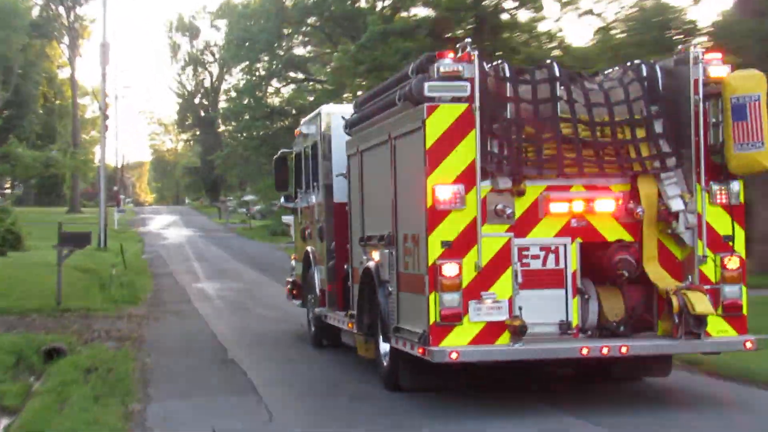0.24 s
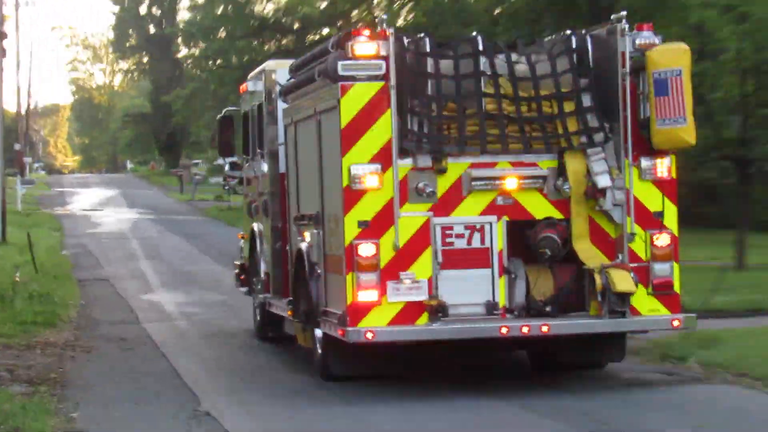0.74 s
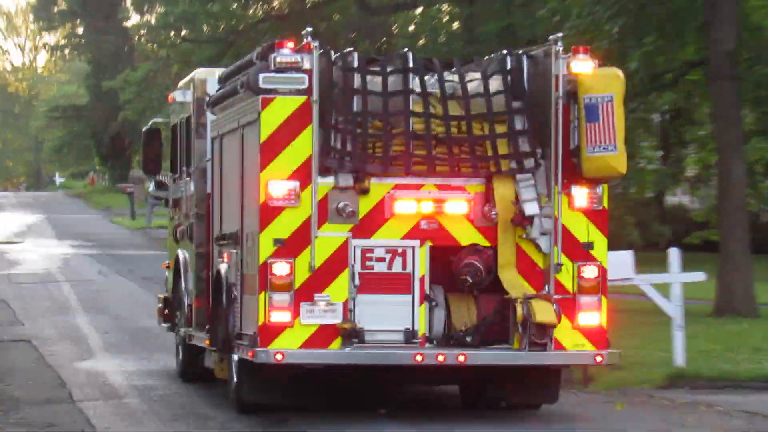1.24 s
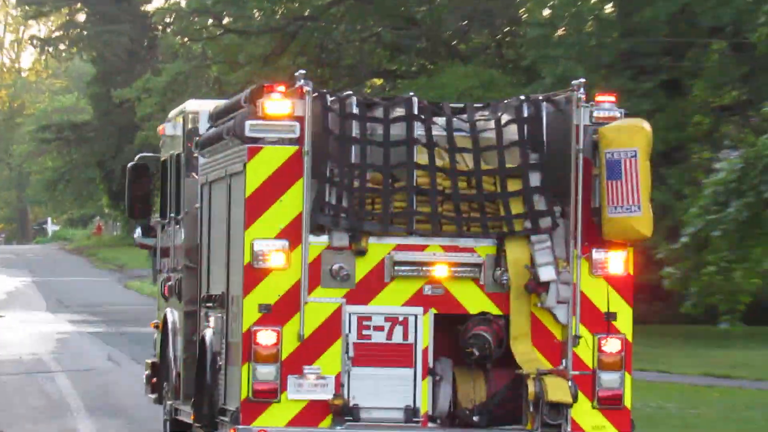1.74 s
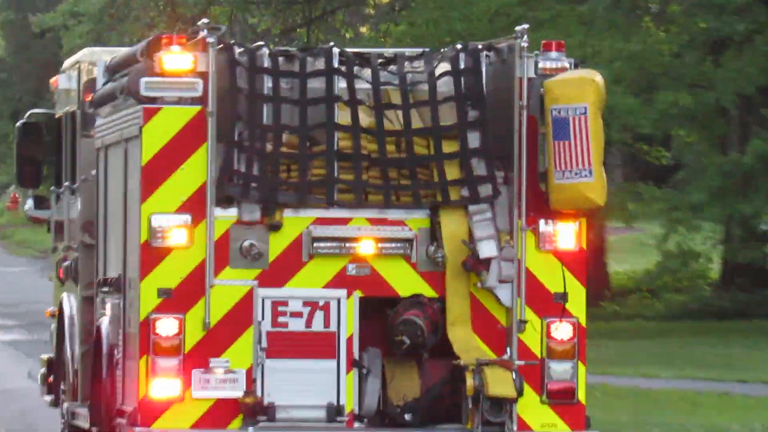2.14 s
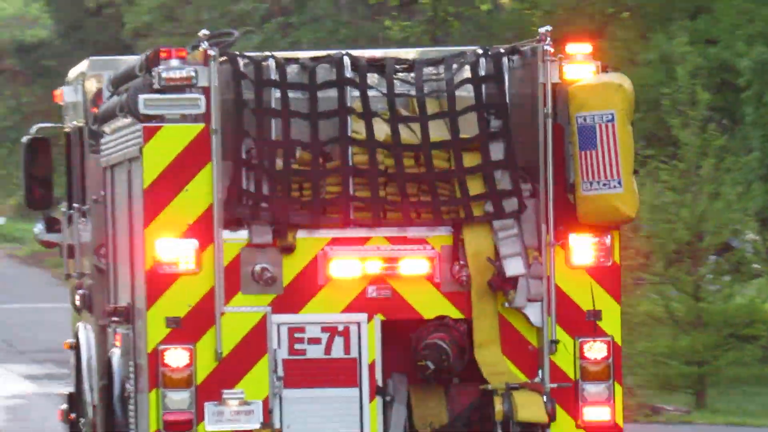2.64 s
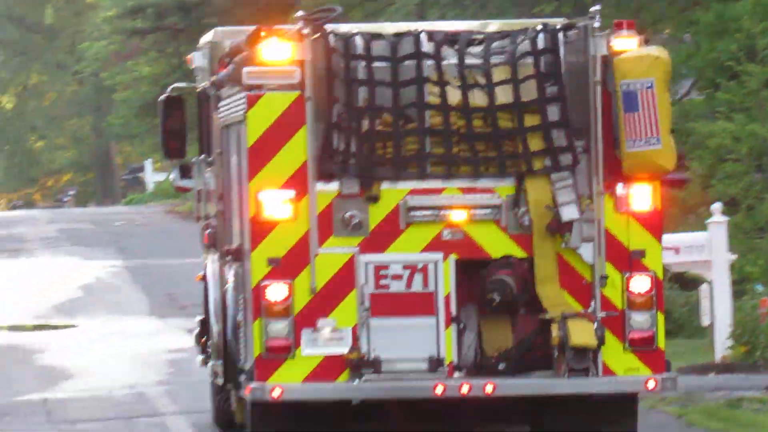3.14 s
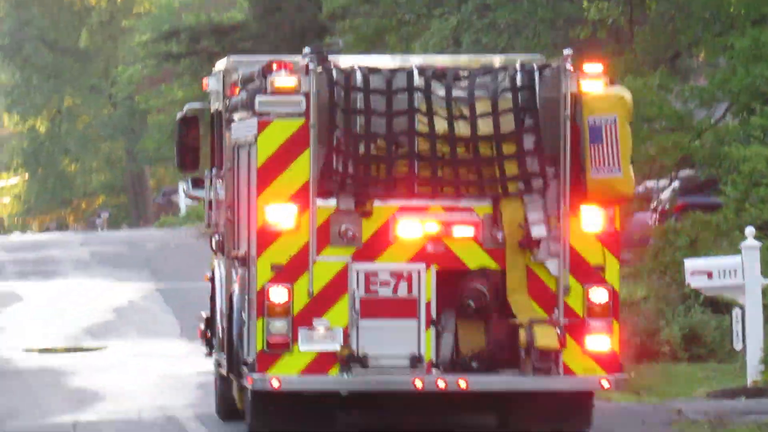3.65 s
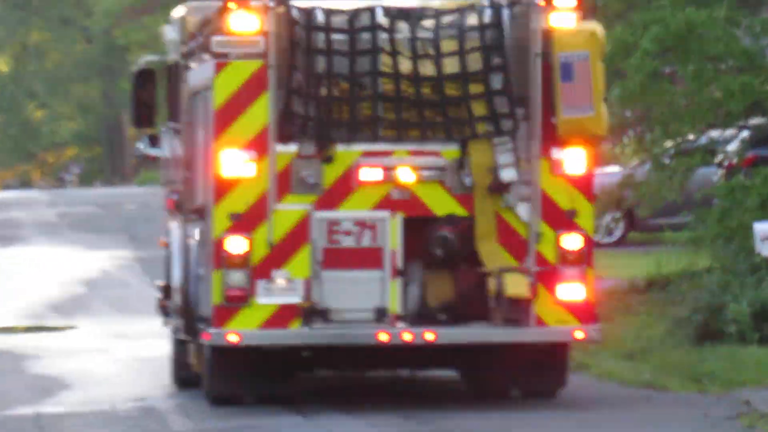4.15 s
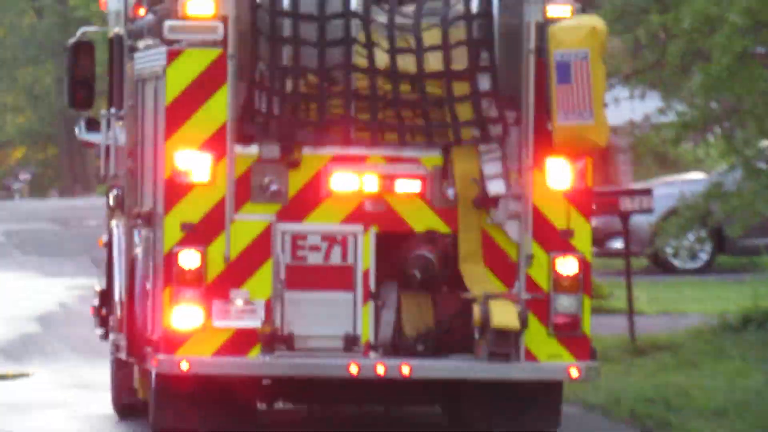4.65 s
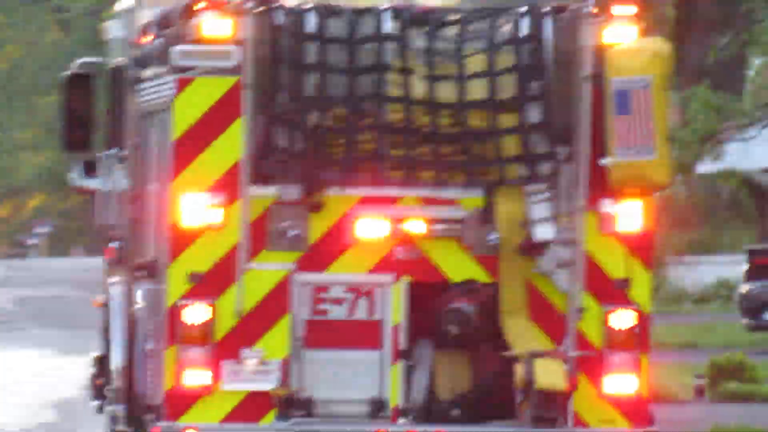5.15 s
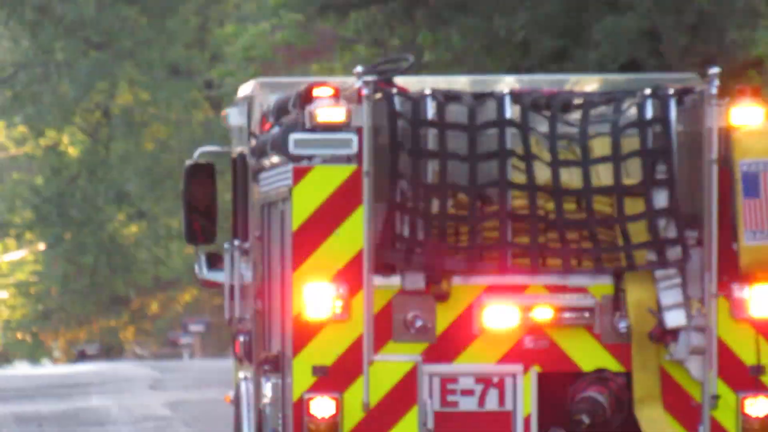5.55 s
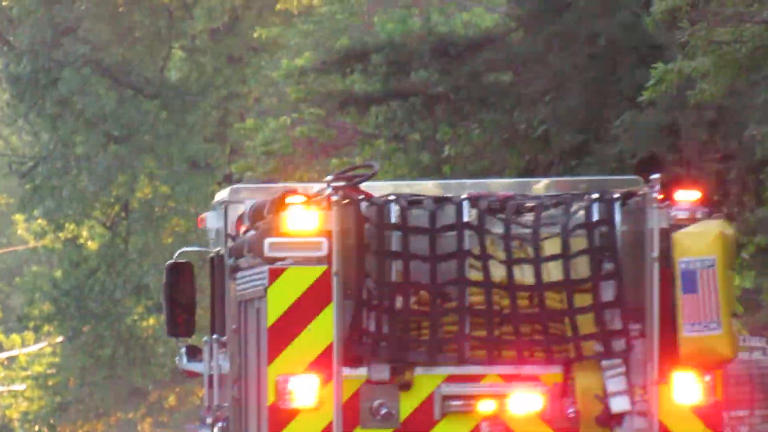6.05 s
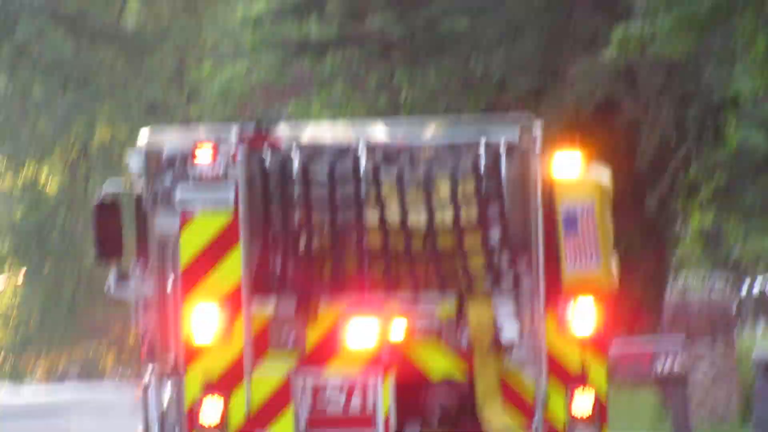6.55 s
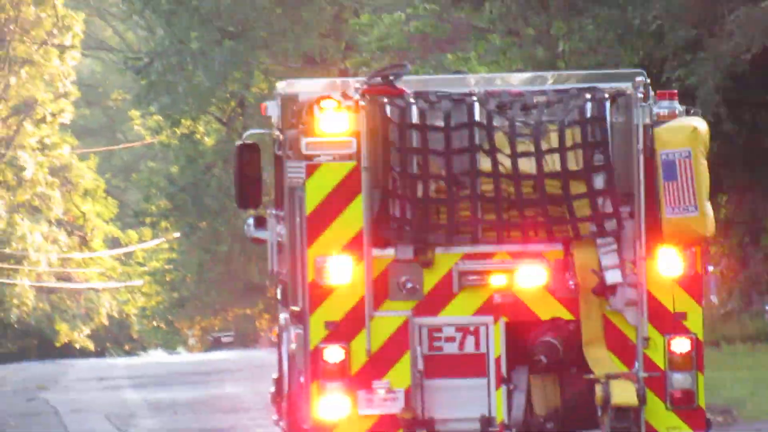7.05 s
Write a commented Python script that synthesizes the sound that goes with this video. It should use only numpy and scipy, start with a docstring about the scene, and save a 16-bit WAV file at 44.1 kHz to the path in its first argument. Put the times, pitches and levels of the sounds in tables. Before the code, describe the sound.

A low, uneven drone from a departing fire engine dominates, with diesel throb and roar easing only slightly. Early on come a few knocks, short puffs of air and the faint falling tones of a coasting siren; later there is a longer soft hiss and small birds chirp in the roadside trees. The camera's own zoom motor adds a faint, very high whirr, and the bass sits mostly on the right.

```python
"""A heavy diesel truck rolls away down a tree-lined street. Its fan blades hum, and its engine
rumbles, roars and clatters. A coasting siren rotor chops the air into faint falling tones,
the bodywork knocks, and tyres and brake air hiss. Birds trill and whistle in the trees.
Close by, a small camera's zoom motor ticks near 13 kHz, and its left microphone port loses the bass."""
import sys
import numpy as np
from scipy import signal
from scipy.fft import rfft, irfft, next_fast_len
from scipy.io import wavfile
from scipy.ndimage import uniform_filter1d, map_coordinates

SR = 44100
rng = np.random.default_rng(int(sys.argv[2]) if len(sys.argv) > 2 else 0)


def persist_wave(psi):
    """Save psi, clipped to +-1, as 16-bit WAV."""
    counts = np.round(np.clip(psi, -1, 1) * 32767).astype(np.int16)
    wavfile.write(sys.argv[1], SR, np.atleast_2d(counts).T)


N = 322371

FAN_PITCH = [(0.0, 180.5), (0.79, 181.5), (0.83, 185.1), (1.63, 184.6), (1.69, 180.6), (1.85, 190.1),
             (1.99, 183.1), (2.26, 182.2), (2.32, 185.5), (2.77, 190.3), (2.93, 186.1), (3.4, 190.8),
             (3.48, 187), (4.13, 182.8), (4.19, 194.1), (4.25, 188.8), (4.44, 189.1), (4.52, 195.8),
             (4.6, 190.7), (5.19, 189.7), (5.27, 197.8), (5.33, 188.1), (5.54, 198.5), (5.7, 189.8),
             (5.84, 198.2), (6.03, 190.8), (6.15, 199.3), (6.31, 191.2), (6.51, 199.4), (6.68, 191.2),
             (6.8, 191.6), (6.88, 199.8), (6.94, 187.1), (7.02, 196.4), (7.13, 191.6), (7.31, 195.0)]  # wandering tone of the blades [t/s, f/Hz]
FAN_LEVEL = [(0, -19.5), (.57, -18), (.79, -23.5), (.93, -14), (.97, -25.5), (1.14, -11.5), (1.33, -14.5),
             (1.63, -19.5), (1.71, -22.5), (1.77, -12.5), (1.85, -17), (2.04, -13), (2.09, -21),
             (2.13, -11), (2.19, -14), (2.22, -30), (2.26, -16.5), (2.32, -20.5), (2.42, -9), (2.5, -20),
             (2.73, -16), (2.78, -22.5), (2.91, -14), (3.28, -13.5), (3.38, -22), (3.46, -29),
             (3.54, -15.5), (3.66, -23.5), (3.73, -14), (3.81, -26.5), (4.13, -19), (4.21, -23),
             (4.26, -14.5), (4.42, -13), (4.54, -24), (4.6, -25), (4.82, -19.5), (4.86, -29.5),
             (5.04, -16.5), (5.09, -30), (5.15, -15.5), (5.27, -24), (5.44, -11), (5.5, -20.5), (5.54, -13),
             (5.63, -29), (5.66, -13.5), (5.7, -24), (5.74, -10.5), (5.8, -25), (5.99, -17), (6.17, -21),
             (6.45, -15), (6.54, -30), (6.68, -17.5), (6.84, -15), (6.88, -34), (6.92, -16), (7.0, -29.5),
             (7.12, -17.5), (7.17, -25), (7.21, -16), (7.31, -17)]  # its swells and fades [t/s, level/dB]
FAN_BLUR = [(0, .03), (4.4, .04), (7.31, .06)]  # air blurs the far tone [t/s, noise share/0-1]
FAN_TWIN = [(0, -22), (.6, -18), (.8, -11), (1.1, -20), (3.3, -20), (3.7, -16), (4.35, -20), (4.9, -15),
            (6.1, -15), (7.31, -18)]  # a weaker tone just above the blade tone [t/s, relative level/dB]
FAN_OVERTONES = [(2, -25), (3, -36)]  # [multiple of the blade tone, relative level/dB]

EXHAUST_TONE = [(0, 139.4, -56), (1, 140, -56), (2, 141, -42), (3, 144, -35), (3.8, 144, -39),
                (4.2, 146, -50), (4.6, 148, -36), (5.5, 148.5, -37), (6.5, 149.5, -35), (7.31, 149.5, -38)]  # [t/s, f/Hz, level/dB]
EXHAUST_STACK = [(.5, -11), (1, 0), (2, -9), (8 / 3, -2)]  # [multiple of the exhaust tone, relative level/dB]
ENGINE_LEVELS = [(0, -36.5, -49), (.2, -38, -48), (.5, -36.5, -45), (.68, -38, -48), (1.0, -37, -42.5),
                 (1.28, -38, -47), (2.5, -34.5, -42.5), (2.6, -33.5, -46.5), (4.6, -37, -50),
                 (4.95, -38.5, -50.5), (5.95, -38, -43.5), (6.4, -39.5, -43), (6.8, -40, -46.5),
                 (7.31, -41, -48)]  # [t/s, roar level/dB, clatter level/dB]
THROB_LEVEL = [(0, -36.5), (1.3, -35), (3, -33.5), (5.3, -34.5), (7.31, -36)]  # deep throb of the body [t/s, level/dB]
SHUDDERS = [(.5, 0.16, -1, 3.5), (0.758, 0.095, 5, 4.5), (0.875, 0.086, 1.5, 7), (1, 0.033, 5.5, 5),
            (2.452, 0.24, 2.5, 0.5), (3.897, 0.99, 1.5, 2.5)]  # the body shakes [t/s, half length/s, rumble rise/dB, throb rise/dB]
ROAD_NOTCHES = [(690, 62, -13), (688, 85, -19)]  # road echo cancels a band, near then far [f/Hz, width/Hz, gain/dB]
# The colours of the engine's four noises, from low to high [f/Hz, relative level/dB]
THROB_COLOUR = [(20, -31), (40, -7), (70, 7), (110, 7.5), (140, 8.5), (180, -34), (260, -120)]
RUMBLE_COLOUR = [(100, -25.5), (140, 1.5), (240, 2), (300, -3), (380, -0.5), (500, -10), (600, -12.5),
                 (680, -22.5), (800, -69), (1000, -120)]
ROAR_COLOUR = [(560, -36), (650, 4.5), (813, -3), (1100, 0), (1410, -1.5), (1630, -2.5), (1940, -17),
               (2050, -16.5), (2660, -19.5), (4500, -120)]
CLATTER_COLOUR = [(1120, -11.5), (1900, -5.5), (2240, -1), (2570, -7.5), (3110, -8.5), (3460, -15),
                  (4190, -15), (4600, -19.5), (5980, -24), (10100, -120)]

SIREN_ROTOR = [(0, 133.5, 3), (.75, 127.5, 2), (2.25, 116.6, 2), (2.9, 112, -2), (3.75, 106.1, -5),
               (5.25, 96.2, -7), (7.31, 83.8, -13)]  # the slowing chop [t/s, f/Hz, gain/dB]
SIREN_COLOUR = [(250, -41), (320, -33), (390, -42), (470, -39.5), (520, -37.5), (585, -41), (670, -58),
                (720, -57), (780, -50), (850, -56), (930, -68), (1300, -58), (1450, -50), (1850, -49.5),
                (2000, -62)]  # tones as horn and road echo shape them [f/Hz, level/dB]
KNOCKS = [(.156, -44, -38), (.928, -36, -30), (.934, -44, -33), (.943, -51, -40), (.953, -56, -38),
          (.961, -52, -42), (.969, -50, -46), (.979, -43, -34), (.991, -52, -39), (1.693, -52, -42),
          (2.278, -56, -40), (2.5, -47, -39), (3.945, -54, -47), (4.0, -51, -47), (4.148, -49, -43)]  # hits on the bodywork [t/s, crack level/dB, panel level/dB]
PANEL_RINGS = [(1350, 900, 1), (2500, 900, 0), (3900, 1200, -5)]  # where a panel resonates [f/Hz, width/Hz, gain/dB]
CLINKS = [(1.693, 2650, -35, .035), (2.501, 2230, -30.5, .12)]  # small metal parts [t/s, f/Hz, level/dB, time to fade 60 dB/s]
HISS_LEVEL = [(0, -64), (.38, -63), (.45, -49), (.59, -48), (.73, -55), (.92, -49), (.97, -47.5),
              (1.2, -61.5), (2.8, -53), (3.5, -55.5), (4.7, -59.5), (5.25, -47), (5.44, -50), (5.58, -47.5),
              (6.35, -48.5), (6.9, -63), (7.06, -54), (7.31, -55)]  # tyres and brake air [t/s, level/dB]
HISS_COLOUR = [(2470, -3), (4200, -0.5), (4620, -6), (6110, -4), (8330, -6.5), (10000, -11.5), (11500, -17),
               (12500, -27), (13500, -39), (14800, -49)]  # [f/Hz, relative level/dB]
WASH_COLOUR = [(800, -120), (1100, 4.5), (4000, -1), (9000, 0.5), (11000, -4), (13000, -3.5), (14800, -13)]  # the truck's far wash off the houses [f/Hz, relative level/dB]

TRILL = [(2.805, -49, 4910), (2.9382, -44, 4870), (3.0633, -44, 4940), (3.1966, -44.5, 4950),
         (3.343, -44, 4880), (5.913, -46.5, 4660), (6.0468, -44, 4620), (6.1843, -44, 4740),
         (6.3166, -45.5, 5050), (6.4623, -46.5, 4810), (6.6357, -47.5, 4800)]  # a small bird, one row a chirp [t/s, level/dB, low note f/Hz]
SOFT_PIPS = [(.065, -12), (.097, -10)]  # softer high notes in each chirp [delay/s, relative level/dB]
WHISTLES = [(.322, .03, 4200, 3600, -54), (1.465, .07, 4700, 3700, -52), (2.015, .045, 4650, 3700, -57),
            (2.78, .19, 3300, 2650, -50.5), (4.265, .045, 2850, 3280, -47.5),
            (4.375, .045, 3100, 3250, -59), (4.53, .03, 2950, 2800, -56), (4.552, .04, 3400, 3100, -55),
            (4.58, .04, 2750, 3130, -48), (4.62, .04, 3120, 3050, -61), (4.8, .03, 3700, 3200, -55),
            (4.824, .028, 3200, 3150, -50), (6.555, .035, 2350, 1950, -48), (6.625, .03, 2150, 2300, -54),
            (6.74, .03, 2200, 2350, -49), (6.845, .03, 2150, 2400, -49.5), (6.945, .028, 2380, 2450, -47.5),
            (7.055, .03, 2500, 2400, -47.5), (7.168, .028, 2350, 2450, -48), (7.28, .025, 2430, 2450, -55)]  # sliding bird notes [t/s, length/s, start f/Hz, end f/Hz, level/dB]

ZOOM_RUNS = [(.002, 2.575, 199.6, -65, -42.5), (3.8863, 5.427, 119.8, -47, -47)]  # [start t/s, end t/s, step rate/Hz, first level/dB, last level/dB]
STEP_STRENGTHS = [-1, 0, -3, -2, -4, -13]  # the six steps of one motor turn [relative level/dB]
# The lens barrel's ring, and the colour of the motor's friction [f/Hz, width/Hz, gain/dB]
LENS_RING, WHIRR_COLOUR = [(13160, 690, 1.4)], [(9100, 6500, 0.39), (13200, 670, 1.3)]
PORT_LIKENESS = [(45, .7), (100, .8), (190, 0.92), (1000, 0.9), (2000, 1), (2500, 0.68), (3200, 0.94),
                 (5000, 0.9), (8000, 0.71), (12000, 0.41)]  # how alike noise is at the two microphone ports [f/Hz, likeness/0-1]
STIR_COLOUR = [(20, -23), (70, 9), (150, -12), (300, -32), (600, -80), (900, -120)]  # air stirring at the left port [f/Hz, relative level/dB]


def fan():
    """The blades hum; a weaker tone beats with theirs, and the hum blurs as the truck leaves."""
    hz, db, noise_share, twin_db = curves(FAN_PITCH, FAN_LEVEL, FAN_BLUR, FAN_TWIN)
    beat_hz = 9 + 3 * wobble(3)
    twin = amp(twin_db) * tone(hz + beat_hz, noise_share, flutter_hz=10)
    overtones = sum(amp(gain) * tone(k * hz, .3, flutter_hz=12) for k, gain in FAN_OVERTONES)
    blades = tone(hz, noise_share, flutter_hz=25)
    return amp(db) * (blades + twin + overtones) / np.sqrt(1 + amp(2 * twin_db))


def engine():
    """Exhaust tones over a throb and a rumble; each firing pulses the roar and the clatter."""
    hz, db, roar_db, clatter_db, throb_db = curves(EXHAUST_TONE, ENGINE_LEVELS, THROB_LEVEL)
    t = np.arange(N) / SR
    rumble_rise, throb_rise = sum(np.outer(rises, np.exp(-((t - at) / half_length) ** 2))
                                  for at, half_length, *rises in SHUDDERS)
    exhaust = sum(amp(db + gain) * tone(k * hz, .08, flutter_hz=8) for k, gain in EXHAUST_STACK)
    firing = np.cos(np.pi * np.cumsum(hz) / SR)  # swings at half the exhaust pitch
    load = wobble(9)  # uneven load moves rumble, roar and clatter together
    throb = amp(throb_db + throb_rise) * rush(THROB_COLOUR, patchy_db=.5)
    rumble_db = -25.5 - .42 * t + rumble_rise  # fades as the truck leaves
    rumble = amp(rumble_db + 1.4 * load) * rush(RUMBLE_COLOUR, patchy_db=.23)
    roar_pulse = amp(firing + .74 * wobble(60))
    roar = amp(roar_db + .16 * load) * rush(ROAR_COLOUR, patchy_db=.77, pulse=roar_pulse)
    clatter_pulse = amp(.33 * firing + .91 * wobble(150))
    clatter = amp(clatter_db + .5 * load) * rush(CLATTER_COLOUR, patchy_db=1, pulse=clatter_pulse)
    return exhaust + throb + road_echo(rumble + roar) + clatter


def road_echo(sound):
    """The echo off the road cancels one narrow band, more deeply as the truck gets farther away."""
    near, far = (filtered(sound, lambda f: amp(db * np.exp(-((f - hz) / width) ** 2)))
                 for hz, width, db in ROAD_NOTCHES)
    return near + (far - near) * np.linspace(0, 1, N)


def siren():
    """The coasting rotor chops the air ever slower: a stack of tones falls, the high ones dying first."""
    chop_hz, db = curves(SIREN_ROTOR)
    t = np.arange(N) / SR
    stack = np.zeros(N)
    for k in range(2, 16):
        tone_db = db + look_up(SIREN_COLOUR, k * chop_hz) - 6 * (k > 8) * t
        stack += amp(tone_db) * tone(k * chop_hz, .13, flutter_hz=10)
    return stack


def bodywork():
    """Each knock is a bright crack plus a duller panel thud; small metal parts clink."""
    cracks, thuds, clinks = np.zeros((3, N))
    t = np.arange(SR // 10) / SR
    for at, crack_db, panel_db in KNOCKS:
        place(cracks, at, amp(crack_db + 6 - 60 * t / .03) * rng.standard_normal(len(t)))
        place(thuds, at, amp(panel_db + 12 - 60 * t / .05) * rng.standard_normal(len(t)))
    for at, hz, db, fade_s in CLINKS:
        phase = 2 * np.pi * hz * t
        place(clinks, at, amp(db - 60 * t / fade_s) * (np.sin(phase) + .6 * np.sin(.94 * phase)))
    return resonate(cracks, [(4500, 6000, 0)]) + resonate(thuds, PANEL_RINGS) + clinks


def tyres_and_air():
    """Tyres and escaping brake air hiss over the truck's far wash off the houses."""
    hiss_db, = curves(HISS_LEVEL)
    t = np.arange(N) / SR
    wash = amp(-55 - t) * rush(WASH_COLOUR, patchy_db=2)  # fades 1 dB a second
    hiss = amp(hiss_db) * rush(HISS_COLOUR, patchy_db=1.5, pulse=amp(1.1 * wobble(300)))
    return hiss + wash


def birds():
    """Trills and whistles, roughened by the leaves and softly echoed by the houses."""
    song = np.zeros(N)
    for at, db, low_hz in TRILL:
        chance = rng.standard_normal(4)
        start = at - .003
        for k, (delay, gain) in enumerate([(.00039, .0095), *SOFT_PIPS]):  # the main pip comes first
            pip_hz = 5870 + 25 * chance[k]
            place(song, start + delay, bird_note(.016, pip_hz - 50, pip_hz + 30, db + gain))
        low_note = bird_note(.014, low_hz - 250, low_hz + 100, db - 10)
        thin_top_note = bird_note(.016, 8700, 8700, db - 19 + 3 * chance[3])
        place(song, start + .028, low_note)
        place(song, at + .004, thin_top_note)
    for at, *note in WHISTLES:
        place(song, at, bird_note(*note))
    t = np.arange(SR // 4) / SR
    tail = amp(-60 * t / .3) * rng.standard_normal(len(t))
    echo = signal.fftconvolve(song, tail / np.linalg.norm(tail))[:N]
    leaves = amp(1.5 * wobble(250))
    return song * leaves + amp(-9) * echo


def bird_note(length_s, from_hz, to_hz, db):
    """One pure note that swells and fades while its pitch slides."""
    progress = np.linspace(0, 1, round(length_s * SR))
    hz = from_hz + (to_hz - from_hz) * np.sin(progress * np.pi / 2)
    swell = np.sqrt(np.abs(np.sin(np.pi * progress)))
    return amp(db) * swell * np.sin(2 * np.pi * np.cumsum(hz) / SR)


def zoom_motor():
    """A stepping motor ticks into the lens barrel, six unequal steps a turn, over a friction whirr."""
    ticks, level = np.zeros((2, N)), np.zeros(N)
    t = np.arange(N) / SR
    for start, end, step_hz, first_db, last_db in ZOOM_RUNS:
        step = np.floor((t - start) * step_hz + .05 * wobble(3) + .006 * wobble(150)).astype(int)
        running = (t > start) & (t < end)
        hits = np.flatnonzero(np.diff(step) * running[1:])
        step_db = np.take(STEP_STRENGTHS, step[hits] % len(STEP_STRENGTHS))
        scatter_db = 3 * rng.standard_normal((len(hits), 2)).T
        ticks[:, hits] = np.sqrt(SR / step_hz) * amp(step_db + scatter_db)
        ticks[1, hits[rng.random(len(hits)) < .25]] *= -.7  # the two ports disagree now and then
        level += running * np.interp(t, [start, end], amp([first_db, last_db]))
    friction = amp(-8.5) * (rng.standard_normal((2, N)) + rng.standard_normal(N)) / np.sqrt(2)
    motor = resonate(level * ticks, LENS_RING) + resonate(level * friction, WHIRR_COLOUR)
    return motor * amp([[.8], [-.8]])  # a little louder on the left


def tone(hz, noise_share, flutter_hz):
    """A tone that follows a pitch curve; a share of its power flutters at random."""
    steady = np.exp(2j * np.pi * (np.cumsum(hz) / SR + rng.random()))
    flutter = wobble(flutter_hz) + 1j * wobble(flutter_hz)
    blur = np.sqrt(1 - noise_share) + np.sqrt(noise_share / 2) * flutter
    return np.sqrt(2) * np.real(steady * blur)


def rush(colour, patchy_db, pulse=1):
    """Rushing stereo noise of power 1, with louder and softer patches across time and pitch."""
    grid = signal.stft(pulse * rng.standard_normal((2, N)), nperseg=512)[2]
    patches = uniform_filter1d(rng.standard_normal(grid.shape[1:]), 6, axis=0)
    patches = uniform_filter1d(patches, 14, axis=1)
    noise = signal.istft(grid * amp(patchy_db * unit(patches)), nperseg=512)[1][:, :N]

    def colour_and_width(hz):
        spread = np.arccos(look_up(PORT_LIKENESS, hz)) / 2
        return amp(look_up(colour, hz)) * [np.cos(spread), np.sin(spread)]
    middle, side = filtered(noise, colour_and_width)
    return unit(np.array([middle + side, middle - side]))


def resonate(sound, rings):
    """Passes a sound twice through a set of resonances, each (f/Hz, width/Hz, gain/dB)."""
    def one_pass(f):
        return sum((-1) ** k * amp(db) * 1j * f * width / (hz * hz - f * f + 1j * f * width)
                   for k, (hz, width, db) in enumerate(rings))
    return filtered(sound, lambda f: one_pass(f) ** 2)


def filtered(sound, response):
    """Multiplies each frequency in a sound by response(f)."""
    size = next_fast_len(N + SR // 2)
    return irfft(rfft(sound, size) * response(np.fft.rfftfreq(size, 1 / SR)), size)[..., :N]


def wobble(rate):
    """A smooth curve through `rate` random points a second."""
    coarse = np.arange(0, N + 32, 32)
    points = rng.standard_normal(int(N * rate / SR) + 4)
    return np.interp(np.arange(N), coarse, map_coordinates(points, [coarse * rate / SR]))


def curves(*tables):
    """Turns every column after a table's time column into one value per sample."""
    t = np.arange(N) / SR
    return [np.interp(t, times, column)
            for times, *columns in map(np.transpose, tables) for column in columns]


def look_up(table, hz):
    """Reads a (f/Hz, value) table at any frequency, on a log scale."""
    freqs, values = np.transpose(table)
    return np.interp(np.log(hz + 1), np.log(freqs + 1), values)


def place(track, start_s, sound):
    """Adds a short sound to a track."""
    room = track[round(start_s * SR):][:len(sound)]
    room += sound[:len(room)]


def amp(db):
    """Turns decibels into a multiplier."""
    return 10 ** (np.asarray(db) / 20)


def unit(sound):
    """Scales a sound to an average power of 1."""
    return sound / np.sqrt(np.mean(sound ** 2) + 1e-20)


def scene():
    """The truck, the birds and the zoom motor together."""
    return fan() + engine() + siren() + tyres_and_air() + bodywork() + birds() + zoom_motor()


def record(dry):
    """The level dips briefly; the left port loses bass and rumbles faintly; the top treble is cut."""
    t = np.arange(N) / SR
    dip_db = -4.5 * uniform_filter1d(1. * ((t > 3.878) & (t < 3.943)), size=200)

    def ports(hz):
        bass_cut = 1j * hz / (1280 + 1j * hz) * 1j * hz / (70 + 1j * hz)  # below 1280 Hz and 70 Hz
        left_db = -.5 - .55 * (hz > 3600) * (hz < 9000)
        return np.array([amp(left_db) * bass_cut, np.ones_like(hz)])
    heard = filtered(dry * amp(dip_db), ports)
    stirring_air = filtered(rng.standard_normal(N), lambda hz: amp(look_up(STIR_COLOUR, hz)))
    heard[0] += amp(-56) * unit(stirring_air)
    return filtered(heard, lambda hz: (hz < 15000) / np.sqrt(1 + (hz / 14050) ** 120))


dry = scene()
out = record(dry)
persist_wave(out)
```